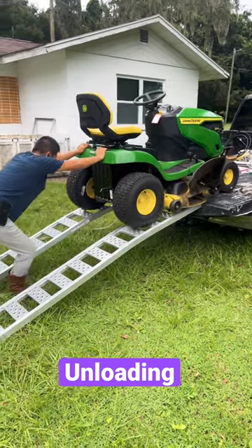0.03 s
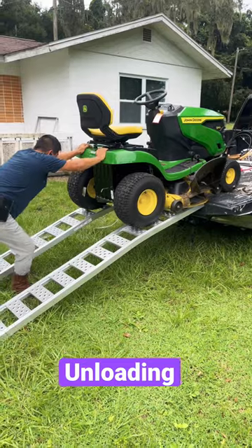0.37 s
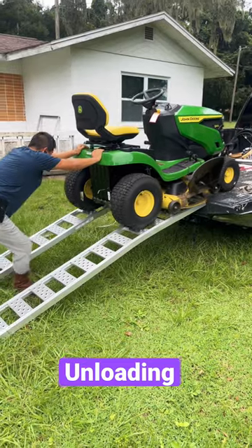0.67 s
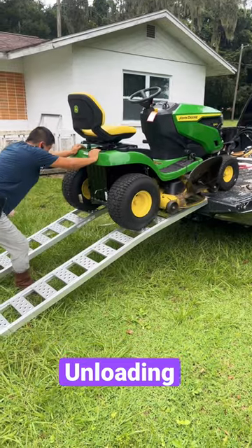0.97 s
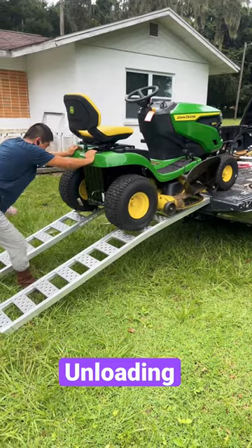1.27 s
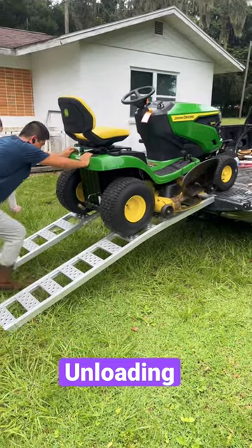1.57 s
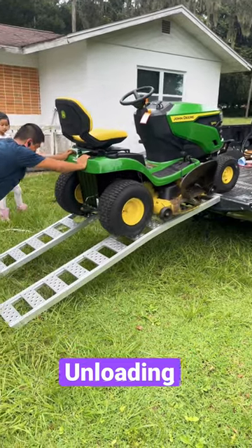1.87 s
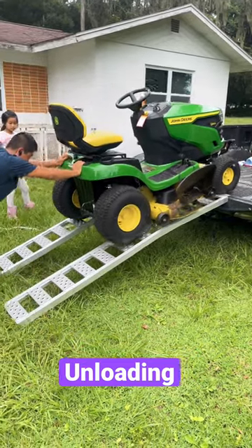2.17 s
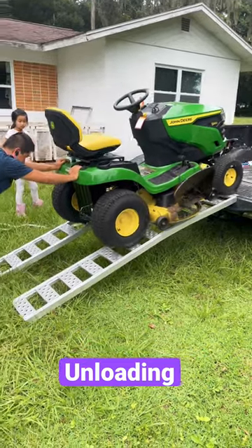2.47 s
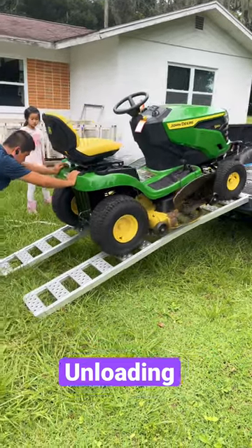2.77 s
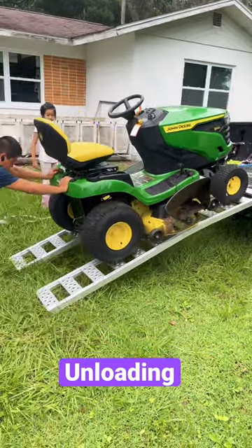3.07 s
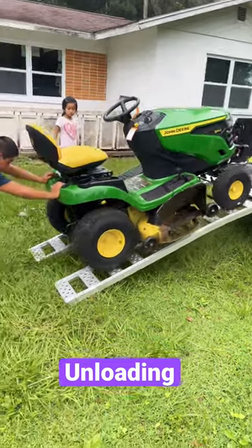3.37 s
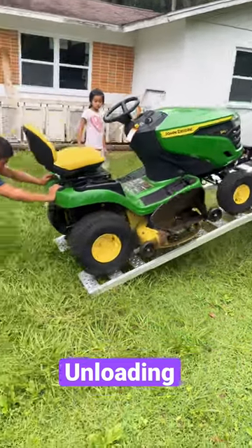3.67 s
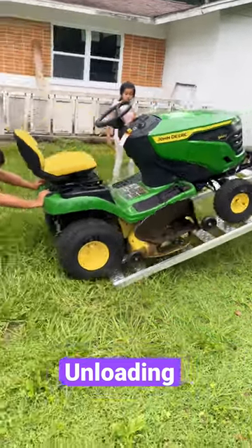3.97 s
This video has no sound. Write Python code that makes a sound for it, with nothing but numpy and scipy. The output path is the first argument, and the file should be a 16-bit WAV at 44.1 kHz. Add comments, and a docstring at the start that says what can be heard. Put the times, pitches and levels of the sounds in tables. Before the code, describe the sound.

A riding tractor rolls down metal ramps close by, its engine off. For the first 2.7 seconds it creeps with scattered light clacks over a low outdoor rumble, a fading roar like distant traffic and a thin hiss. Then the tyres drop from rung to rung, with loud clanging jolts at about 2.8, 3.1, 3.4, 3.7 and 3.9 seconds, while the mower deck rattles and scrapes between them.

```python
"""A riding tractor, engine off, is eased backwards down two aluminium ramps on a lawn.
Near the two-port microphone it creeps with a few clacks, then rolls: the tyres drop from rung to rung,
the ramps boom and the mower deck rattles and scrapes, with short reflections off house and truck.
Further off are a low outdoor rumble, a fading roar like traffic and faint insects;
the microphone adds a thin high hiss."""
import sys
import numpy as np
from scipy import signal
from scipy.fft import rfft, irfft
from scipy.io import wavfile

SR = 44100
rng = np.random.default_rng(int(sys.argv[2]) if len(sys.argv) > 2 else 0)


def log_audio(samples):
    """Write samples as a 16-bit WAV file to the path given in sys.argv[1]."""
    # one column per channel
    frames = np.atleast_2d(samples).T
    # limit to full scale, then quantise
    limited = np.clip(frames, -1, 1)
    pcm = np.round(limited * 32767).astype(np.int16)
    wavfile.write(sys.argv[1], SR, pcm)


N = 176400
T, HZ = np.arange(N) / SR, np.fft.rfftfreq(N, 1 / SR)


# The way down the ramps. Each row: time in seconds, scrape level in dB, frame grumble level in dB.
DESCENT = [(0, -65, -61), (1.38, -63.5, -65), (1.5, -52, -66), (1.85, -57.5, -67), (1.96, -53.5, -54),
           (2.1, -52.5, -62.5), (2.43, -57, -57), (2.58, -50.5, -63), (2.69, -54, -54), (2.78, -39.5, -50),
           (2.99, -48.5, -48.5), (3.2, -39.5, -35), (3.28, -44, -47), (3.35, -39, -43),
           (3.42, -36.5, -36.5), (3.54, -45.5, -38), (3.59, -40, -40.5), (3.68, -35, -37.5),
           (3.785, -42.5, -37), (3.9, -37, -37.5)]
# The tyres' hollow drone and the ramp edge's faint singing. Each row: time in seconds, level in dB.
TYRE_DRONE = [(0, -47), (.3, -49), (.7, -61.5), (1.05, -54.5), (1.5, -58), (2.5, -75), (4, -83)]
EDGE_SING = [(0, -75), (1.1, -70), (1.25, -65), (1.55, -63), (1.75, -64.5), (2.1, -70), (2.75, -63),
             (3.4, -55), (4, -53)]
# Tone of the tyres and of the frame. Each row: frequency in Hz, relative level in dB.
SCRAPE_TONE = [(100, -13.5), (300, 4.5), (900, 4), (2000, -1), (2900, -1.5), (4000, -3.5), (5000, -4),
               (6000, -3.5), (7200, -7), (8400, -2), (9400, 0), (10500, -36), (11700, -25), (12500, -72)]
FRAME_TONE = [(40, -12), (110, -7), (180, 3.5), (235, 1), (300, 4), (360, 0), (430, -3), (600, -6),
              (1200, -8), (4000, -76)]

def rolling():
    """Tyres scrape grittily over the punched ramps; the frame grumbles, the tyres drone hollowly, an edge
    sings."""
    surge_hz, surge_db = 55, 1.9
    surge = unit(irfft(rfft(rng.standard_normal(N)) / (1 + (HZ / surge_hz) ** 4), N))
    grit = impacts(N, per_s=4000, spread_db=3.2) * amp(surge_db * surge)
    clink = amp(-15) * resonance(grit, hz=3080, width_hz=400)
    scrape = (colour(grit, SCRAPE_TONE) + clink) * level(DESCENT, column=1)
    drone = resonance(rng.standard_normal(N), hz=205.4, width_hz=62) * level(TYRE_DRONE)
    sing = resonance(grit, hz=2980, width_hz=300) * level(EDGE_SING)
    grumble = noise(FRAME_TONE) * level(DESCENT, column=2)
    return scrape + grumble + drone + sing


# Jolts through deck and ramps. Each row: peak time in seconds, rattle level in dB, rise and fall
# in seconds, tilt in dB per octave, thud level in dB, clang level in dB.
DECK_JOLTS = [(.125, -45.5, 0.037, 0.01, -1.5, -42.5, -47), (.597, -43, 0.021, 0.005, -0.5, -53, -65),
              (.665, -48, 0.018, 0.0062, 3.5, -73, -67), (.93, -58, .014, 0.037, -4, -42.5, -72),
              (1.688, -40.5, 0.012, 0.012, -0.5, -51.5, -69), (2.2, -45, 0.0059, 0.023, -2.5, -72, -64),
              (2.287, -38.5, 0.02, 0.014, -1, -38.5, -70), (2.341, -42.5, 0.02, 0.009, 2, -62, -64),
              (2.742, -42, 0.016, 0.015, 9, -64, -70), (2.79, -27.5, 0.01, 0.0087, 4, -42.5, -59),
              (2.808, -26, 0.0099, 0.014, -1.6, -34, -48), (2.867, -62, .01, 0.016, -15, -36, -43),
              (2.945, -39.5, 0.0071, 0.009, 8, -62, -63), (3.013, -46, 0.0045, 0.024, -21, -36.5, -62),
              (3.079, -36.5, 0.028, 0.0039, 3, -58, -54), (3.124, -22.5, 0.015, 0.0095, 1, -30.5, -34),
              (3.183, -39, 0.018, 0.046, 2, -38, -60), (3.382, -22.5, 0.012, 0.0055, 0, -30, -30.5),
              (3.424, -34, 0.0095, 0.016, -0.5, -48, -38.5), (3.468, -30, 0.0067, 0.011, -4, -47, -42),
              (3.657, -27, 0.021, 0.022, -3.5, -42, -53), (3.686, -29.5, 0.0036, 0.011, 3, -30.5, -50),
              (3.745, -30.5, 0.011, 0.0035, 2.5, -32, -34.5), (3.818, -33, 0.015, 0.031, 2.5, -31.5, -55),
              (3.8894, -20, 0.0085, 0.01, 2, -36.5, -24), (3.931, -31, 0.034, 0.03, -3, -29, -42),
              (3.986, -33, 0.033, 0.02, 5.5, -53, -55)]
# Tone of the rattle from nearby. Each row: frequency in Hz, relative level in dB.
RATTLE_TONE = [(100, -9), (300, -22), (550, -12.5), (850, -9), (1400, -10.5), (2200, -8.5), (2900, -5),
               (3800, -11.5), (5000, -13), (7200, -12.5), (8500, -1.5), (9400, -8), (10200, -3.5),
               (11200, -21), (12500, -81)]

def jolts():
    """Each jolt swells into a clatter of small impacts and thuds through the frame."""
    clatter, thuds = np.zeros((2, N))
    t = T[:SR // 3] - .1  # zero at the peak
    octaves = np.log2(np.clip(np.fft.rfftfreq(len(t), 1 / SR), 400, 10000) / 2000)
    for s, db, rise, fall, tilt, thud_db, _ in DECK_JOLTS:
        hits = impacts(len(t), per_s=3500, spread_db=2.8)
        hits = unit(irfft(rfft(hits) * amp(tilt * octaves), len(t)))
        envelope = swell(t, rise, fall)
        rattle = unit(colour(small_parts(hits * envelope), RATTLE_TONE))
        add(clatter, s + t[0], amp(db) * rms(envelope) * rattle)
        thud = rng.standard_normal(len(t)) * swell(t, rise=.022, fall=.027)
        add(thuds, s + t[0], amp(thud_db) * thud)
    return clatter + amp(-22) * ringing(clatter) + colour(thuds, FRAME_TONE)


def small_parts(hits, count=26, low_hz=600, high_hz=7367, t60=.032):
    """Impacts ring small metal parts of random pitch, a new set at each jolt."""
    t = T[:SR // 8]
    hz = low_hz * (high_hz / low_hz) ** ((np.arange(count) + rng.random(count)) / count)
    modes = np.sin(2 * np.pi * hz[:, None] * t)
    ring = modes.T @ rng.choice([-1., 1.], count) * amp(-60 * t / t60)
    return unit(hits + amp(-11.5) * unit(signal.oaconvolve(hits, ring)[:len(hits)]))


def clangs():
    """At the peak of a jolt one blow rings deck and ramps."""
    out, ring = np.zeros(N), metal_ring()
    for s, *_, clang_db in DECK_JOLTS:
        add(out, s, amp(clang_db) * ring)
    return out


# Modes of deck and ramps. Each row: frequency in Hz, relative level in dB, 60 dB decay time in seconds.
METAL_MODES = [(300, -48, 0.28), (820, 8, 0.02), (858.5, -0.5, 0.12), (1240, 0, 0.046), (1864, -9, 0.11),
               (1940, -4.5, 0.12), (2600, -7.5, 0.096), (2640, -4, 0.056), (2960, -0.5, 0.084),
               (4080, -1, 0.06), (5620, -5, 0.043), (5750, -20, 0.11)]

def metal_ring():
    """The ring of deck and ramps after one blow."""
    return sum((-1) ** k * amp(db) * note(hz, t60) for k, (hz, db, t60) in enumerate(METAL_MODES))


def ringing(hits):
    """A train of impacts sets deck and ramps ringing."""
    ring = metal_ring()
    return signal.oaconvolve(hits, ring / np.linalg.norm(ring))[:N]


# Tyres landing on rungs. Each row: time in seconds, level in dB, lower and upper pitch in Hz,
# upper level against lower in dB, fall in seconds.
RUNG_LANDINGS = [(2.811, -34, 946, 1240, 3, 0.014), (3.124, -35.5, 813, 1290, -10, 0.013),
                 (3.381, -27.5, 880, 1050, -3, 0.01), (3.657, -41, 690, 860, -3, 0.032),
                 (3.891, -23.5, 726, 857, -1, 0.0067)]

def booms():
    """The weight lands on a rung and shakes two broad ramp resonances, pitched by where the load sits."""
    out, t = np.zeros(N), T[:SR // 3] - .05
    for s, db, lower_hz, upper_hz, upper_db, fall in RUNG_LANDINGS:
        envelope = swell(t, rise=.0016, fall=fall)
        for hz, gain in (lower_hz, amp(db)), (upper_hz, amp(db + upper_db)):
            shake = resonance(rng.standard_normal(N), hz, width_hz=200)[:len(t)]
            add(out, s + t[0], gain * rms(envelope) * unit(shake * envelope))
    return out


# Hollow knocks under the tractor. Each row: start in seconds, level in dB, pitch in Hz.
DECK_KNOCKS = [(2.812, -31, 289), (2.819, -32, 125), (2.915, -37, 402), (3.018, -40, 308),
               (3.134, -28, 132), (3.191, -38, 310), (3.474, -31.5, 414), (3.561, -48, 325),
               (3.675, -36, 300), (3.739, -30, 433), (3.814, -31, 300), (3.924, -40, 230)]

def knocks(rise_s=.0013):
    """The deck bounces on its hangers; each soft blow rings one low mode."""
    out = np.zeros(N)
    for s, db, hz in DECK_KNOCKS:
        ring = note(hz, t60=.13)
        add(out, s, amp(db) * ring * (1 - np.exp(-T[:len(ring)] / rise_s)))
    return out


# Sharp clacks on the tractor. Each row: start in seconds, level in dB, lowest and highest frequency
# in Hz, fall in seconds, the part's note in Hz, note level in dB.
LOOSE_PARTS = [(0.109, -35.5, 1870, 4360, .01, 4060, -50), (.1105, -43.5, 4500, 7300, 0.0065, 2170, -50),
               (.1185, -40, 290, 620, .012, 403, -41), (0.3487, -38.5, 4200, 10000, 0.0012, 6500, -58),
               (1.776, -47, 2540, 3530, 0.028, 3050, -49), (1.95, -51.5, 3500, 9100, 0.028, 6400, -65),
               (2.4798, -33, 1280, 3350, 0.011, 1487, -33), (2.716, -42.5, 1500, 9000, 0.01, 3300, -58),
               (2.9052, -27, 900, 10800, 0.0086, 7350, -36), (3.028, -33, 1920, 6530, 0.0077, 3210, -27.5),
               (3.156, -25.5, 1210, 9800, 0.013, 5800, -47), (3.179, -28, 2260, 7650, 0.0065, 2740, -32),
               (3.3634, -32.5, 348, 8450, 0.0098, 940, -32), (3.463, -31.5, 600, 6500, 0.0043, 972, -40),
               (3.552, -29.5, 447, 6100, 0.0095, 2580, -31), (3.6, -29, 740, 3880, 0.019, 2880, -31),
               (3.638, -30.5, 1210, 9350, 0.016, 6200, -45), (3.876, -26.5, 450, 8350, 0.018, 657, -31)]

def clacks(chatter_top_hz=9500):
    """Loose parts snap brightly against each other, ring their own note and chatter more dully to rest."""
    out, t = np.zeros(N), T[:SR // 6]
    soften = signal.butter(6, chatter_top_hz, fs=SR, output="sos")
    snap = 6 * (t == 0)
    for s, db, low_hz, high_hz, fall, note_hz, note_db in LOOSE_PARTS:
        band = signal.butter(5, [low_hz, high_hz], "band", fs=SR, output="sos")
        dying = np.exp(-t / fall)
        bounces = signal.sosfilt(soften, impacts(len(t), per_s=5000, spread_db=2) * dying)
        chatter = signal.sosfilt(band, snap + bounces)
        add(out, s, amp(db) * rms(dying) * unit(chatter))
        add(out, s, amp(note_db) * note(note_hz, t60=.07))
    return out + amp(-19) * ringing(out)


def yard_echoes(x, t60=.18):
    """Scattered reflections come back from house and truck and die away."""
    t = T[:SR // 2]
    taps = impacts(len(t), per_s=3000, spread_db=.36) * amp(-60 * t / t60)
    return signal.oaconvolve(x, taps / np.linalg.norm(taps))[:N]


# Near sound at the microphone. Each row: frequency in Hz, then, table by table, the left port's
# phase lead in radians, likeness of the ports from 0 to 1, left level over right in dB.
NEAR_PHASE = [(20, 0), (300, 0), (500, .4), (700, -.35), (1100, .05), (2000, .1), (2700, 1.4), (3300, 2.3),
              (3700, -.8), (4200, .15), (4550, 1.1), (4900, 3.4), (5750, 6.2), (6250, 6.3), (7200, 7.7),
              (8400, 9.2), (9500, 9.45), (10600, 10.4), (11400, 12.5)]
NEAR_LIKENESS = [(250, 1), (550, .8), (1400, .98), (2900, .85), (3600, .3), (4200, .75), (5800, .99),
                 (7200, .86), (8600, .98), (9500, .99), (11000, .6)]
NEAR_BALANCE = [(350, 0), (500, 4), (750, 4.5), (1100, 2), (1700, -1), (2900, 1), (4700, -2), (7500, 0),
                (12000, -0.5)]

def tractor():
    """The tractor's direct and scattered sound reaches the microphone with the yard's reflections."""
    direct, scattered = [jolts() + clacks() + booms() + rolling() for _ in range(2)]
    direct += clangs() + knocks()
    heard = [x + amp(-14) * yard_echoes(x) for x in (direct, scattered)]
    return ports(*heard, NEAR_PHASE, NEAR_LIKENESS, NEAR_BALANCE)


# Beyond the lawn. Each row: time in seconds, rumble level in dB, roar level in dB.
FAR_LEVELS = [(0, -47.5, -46), (.55, -42, -44), (1.1, -46, -46.5), (1.7, -46, -50.5), (2.4, -47.5, -52),
              (3.1, -45, -61.5), (4, -43, -58)]
# Tone of the rumble and of the roar. Each row: frequency in Hz, relative level in dB.
RUMBLE_TONE = [(15, -45), (30, -38), (41, -7.5), (57, 0), (80, -3.5), (120, -6.5), (200, -11.5), (300, -22),
               (500, -51), (2000, -111)]
ROAR_TONE = [(60, -49), (200, -11), (450, -4), (750, 1), (1050, 5), (1400, -1.5), (1900, -9.5), (2900, -16),
             (3600, -21), (6000, -32), (12000, -72)]
# Background at the microphone. Each row: frequency in Hz, then, table by table, the left port's
# phase lead in radians, likeness of the ports from 0 to 1, left level over right in dB.
FAR_PHASE = [(0, 0), (350, 0), (690, .1), (1200, .9), (2000, .8), (2800, 1.5), (3450, -1.3), (3800, -2),
             (4200, 2), (5700, 6), (6800, 7.5), (8400, 8), (9500, 9.4), (10900, 11), (11600, 13)]
FAR_LIKENESS = [(150, 0.76), (300, 0.26), (550, 0.12), (1150, 0.28), (1600, 0.86), (2400, 0.66), (4000, 1),
                (6000, 0.43)]
BACKGROUND_BALANCE = [(250, 0.5), (600, 0.8), (1100, -3.5), (2500, 0), (6000, 0.6)]

def rumble_and_roar():
    """A low rumble and a fading roar like traffic arrive from far off to one side."""
    rumble, roar = level(FAR_LEVELS, column=1), level(FAR_LEVELS, column=2)
    far = [noise(RUMBLE_TONE) * rumble + noise(ROAR_TONE) * roar for _ in range(2)]
    return ports(*far, FAR_PHASE, FAR_LIKENESS, BACKGROUND_BALANCE)


# Insects around the lawn. Each row: pitch in Hz, level in dB.
INSECT_TRILLS = [(6380, -79), (7800, -80), (9100, -60.5)]
# Tone of the microphone's hiss. Each row: frequency in Hz, relative level in dB.
HISS_TONE = [(500, 9), (4000, -21), (8400, -80), (9200, 2), (9900, 9), (10800, 9.5), (11200, -63),
             (13000, -59)]

def insects_and_hiss():
    """Faint insects trill in narrow bands over the microphone's steady thin hiss."""
    trills = sum(amp(db) * resonance(rng.standard_normal(N), hz, width_hz=31) for hz, db in INSECT_TRILLS)
    hiss = [amp(-59.5) * noise(HISS_TONE) for _ in range(2)]
    return ports(hiss[0] + trills, hiss[1], NEAR_PHASE, NEAR_LIKENESS, BACKGROUND_BALANCE)


def ports(direct, scattered, phase, likeness, balance, mono_below_hz=550):
    """Two microphone ports hear a sound with a phase lag and partly unalike; the bass is mono."""
    unalike = (1 - read(likeness)) / (1 + (mono_below_hz / (HZ + 1)) ** 4)
    shared = np.sqrt(1 - unalike / 2) * rfft(direct)
    apart = np.sqrt(unalike / 2) * rfft(scattered)
    turn = np.exp(.5j * read(phase)) * amp(read(balance) / 2)
    return irfft(np.array([(shared + apart) * turn, (shared - apart) / turn]), N)


def impacts(samples, per_s, spread_db):
    """A random train of tiny impacts of uneven size."""
    size = amp(spread_db * np.minimum(rng.exponential(1, samples), 4))
    return unit(size * rng.choice([-1., 1.], samples) * (rng.random(samples) < per_s / SR))


def note(hz, t60):
    """One struck mode dying away."""
    t = T[:SR // 3]
    return np.sin(2 * np.pi * hz * t) * amp(-60 * t / t60)


def resonance(x, hz, width_hz):
    """One resonance with steep skirts, at rms 1."""
    return unit(irfft(rfft(x) / (1 + (2 * (HZ - hz) / width_hz) ** 2), N))


def noise(tone):
    """Steady noise with the given spectrum."""
    return unit(irfft(rfft(rng.standard_normal(N)) * amp(read(tone)), N))


def colour(x, tone):
    """Minimum-phase filter with the given spectrum and unit power gain."""
    gain = unit(amp(read(tone, abs(np.fft.fftfreq(4096, 1 / SR)))))
    response = np.exp(np.conj(signal.hilbert(np.log(gain + 1e-6))))
    taps = np.fft.ifft(response).real
    return signal.oaconvolve(x, taps[:len(taps) // 2])[:len(x)]


def swell(t, rise, fall):
    """Exponential rise and fall, in seconds, around a peak at t = 0."""
    return np.exp(np.minimum(t / rise, -t / fall))


def level(table, column=1):
    """One dB column of a time table as a gain curve."""
    table = np.array(table)
    return amp(np.interp(T, table[:, 0], table[:, column]))


def read(table, hz=HZ):
    """Reads a table on a log-frequency axis."""
    row_hz, value = np.transpose(table)
    return np.interp(np.log(hz + 1), np.log(row_hz + 1), value)


def add(mix, s, sound):
    """Mixes a sound in at s seconds."""
    at = round(s * SR)
    sound = sound[max(-at, 0):]
    part = mix[max(at, 0):][:len(sound)]
    part += sound[:len(part)]


def amp(db):
    """Decibels to gain."""
    return 10 ** (np.asarray(db) / 20)


def rms(x):
    """Root mean square."""
    return np.sqrt(np.mean(abs(x) ** 2) + 1e-20)


def unit(x):
    """Scales to rms 1."""
    return x / rms(x)


def scene():
    """From the lawn: the tractor in front, the outdoors behind it, and the microphone's own hiss."""
    return tractor() + rumble_and_roar() + insects_and_hiss()


def record(dry, top_hz=12400):
    """The recorder cuts off the highest treble."""
    lowpass = signal.firwin(255, top_hz, window=("kaiser", 9), fs=SR)
    return signal.oaconvolve(dry, lowpass[None], "same")


dry = scene()
out = record(dry)
log_audio(out)
```